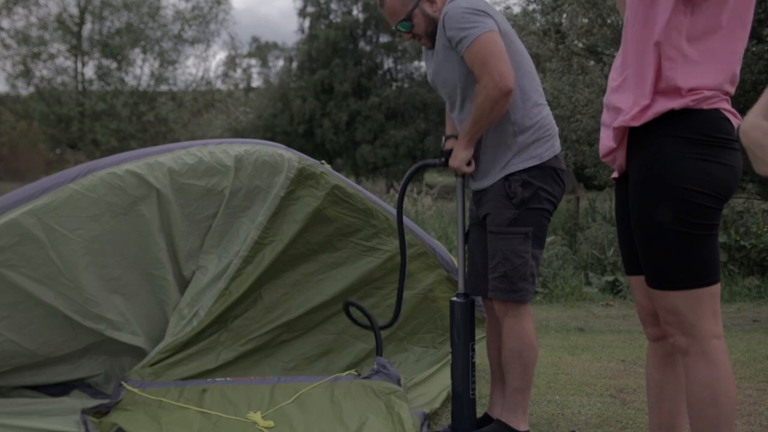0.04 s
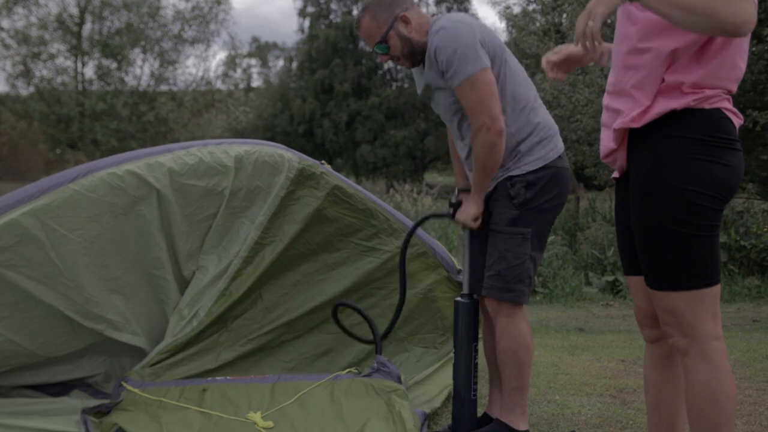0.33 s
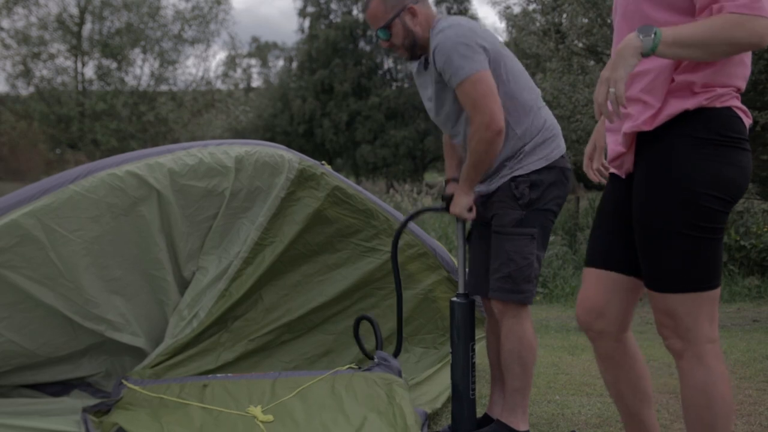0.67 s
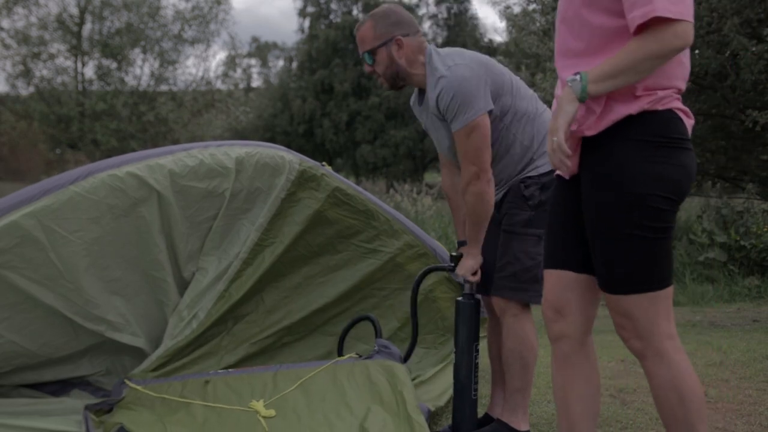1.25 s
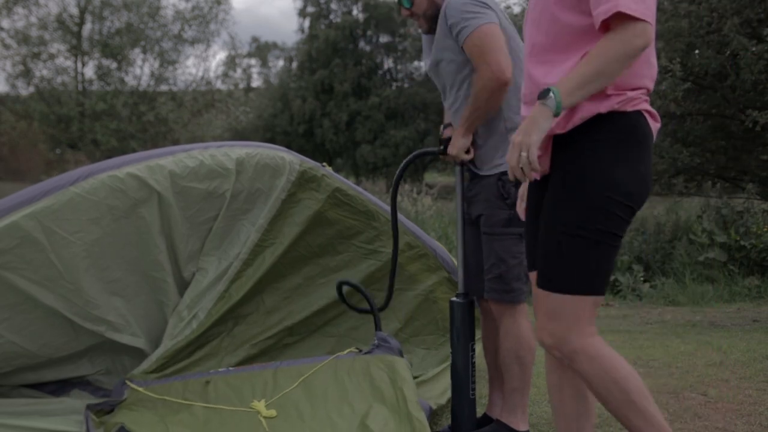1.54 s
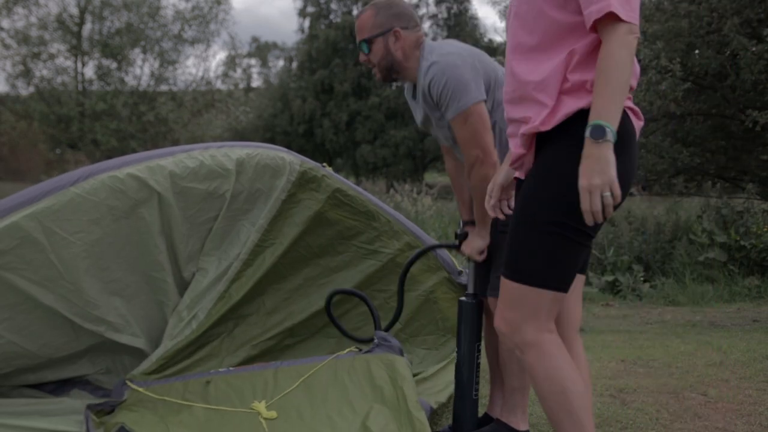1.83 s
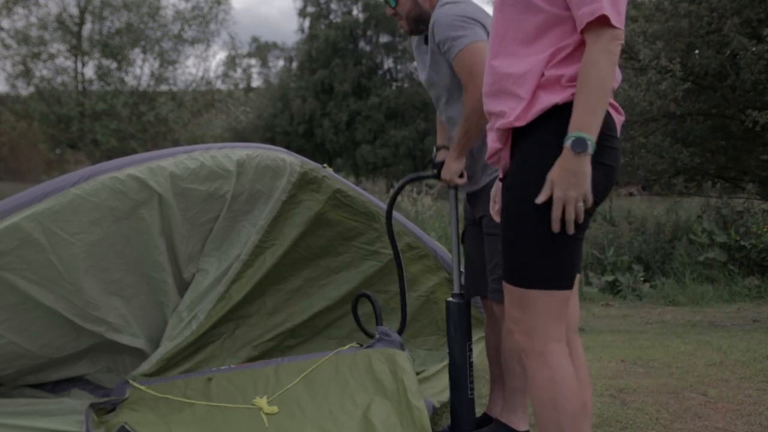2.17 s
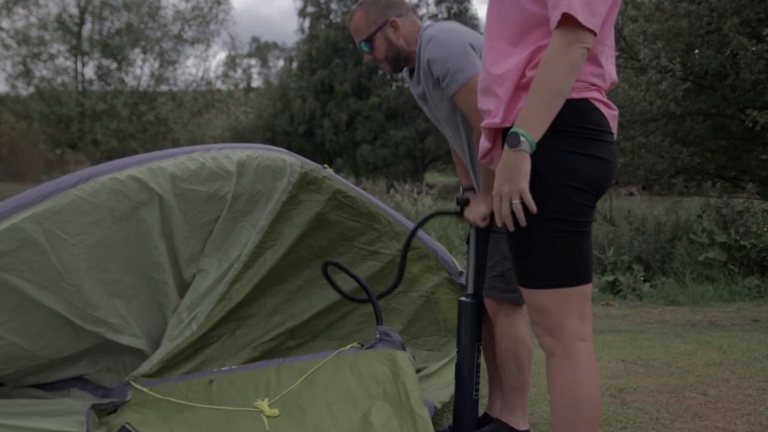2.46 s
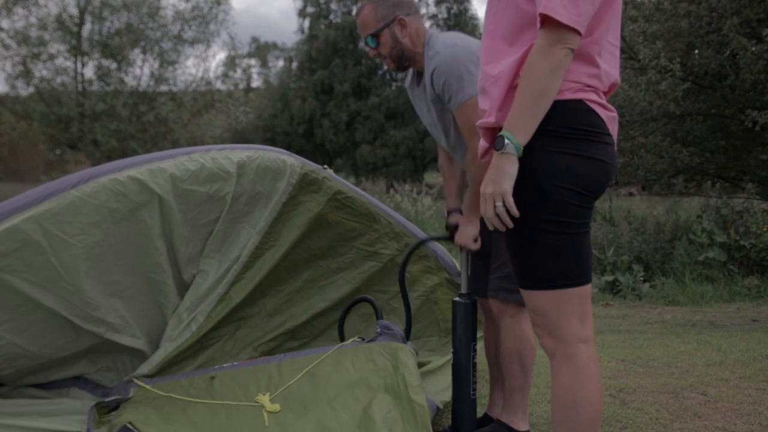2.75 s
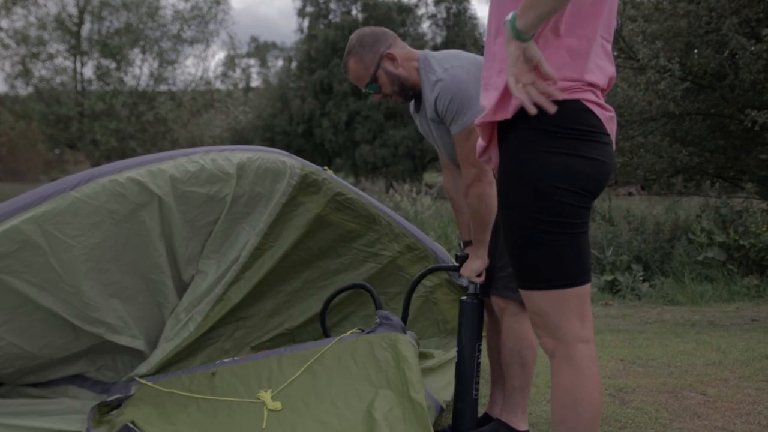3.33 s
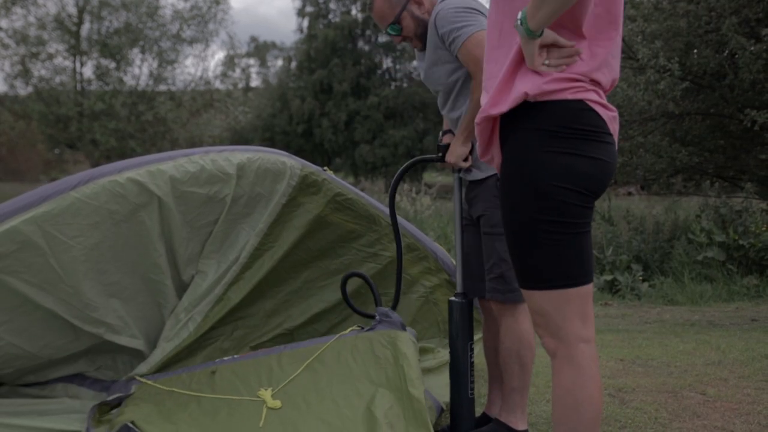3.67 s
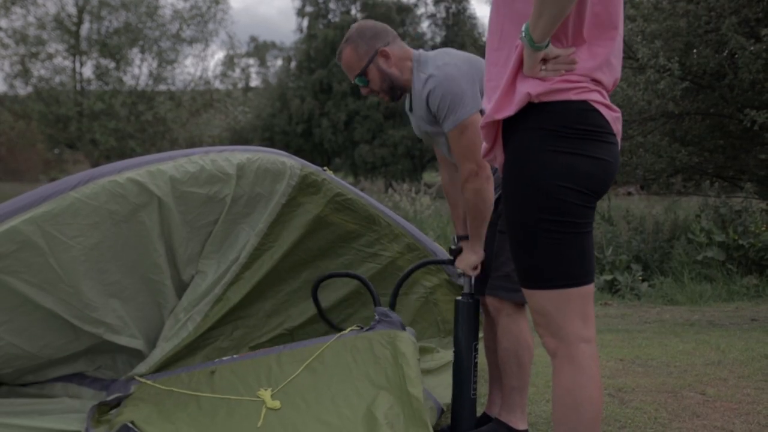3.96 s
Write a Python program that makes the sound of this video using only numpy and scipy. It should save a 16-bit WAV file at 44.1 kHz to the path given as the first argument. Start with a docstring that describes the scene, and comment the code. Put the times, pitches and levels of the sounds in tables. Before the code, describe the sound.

A hand pump fills a tent outdoors, with hissing rushes of air alternating between pull and push about every 0.35 seconds throughout. Thin, slightly falling whistles come from the hose, and each pull ends in a faint rasp. A valve claps at every turn, loudest near 3.8 seconds. Behind lie faint open air, a slight wind puff at 2.3 seconds and a soft step on grass at 2.7.

```python
"""A double-action hand pump fills an air tent on a lawn, breathing hard on every push and pull.
Each stroke is a rush of air through barrel and ribbed hose that swells, holds and dies as the piston
slows; the ribs whistle in sagging tones, and each pull tails off in a rasp. At the turns of the piston
a valve flap flutters and claps over. Behind lie faint open air, one puff of wind and one soft step."""
import sys
import numpy as np
from scipy import signal
from scipy.fft import rfft, irfft
from scipy.io import wavfile

SR = 44100
rng = np.random.default_rng(int(sys.argv[2]) if len(sys.argv) > 2 else 0)


def output_pcm(signal):
    """Save a mono or channel-first signal as 16-bit PCM at the path in sys.argv[1].

    Samples are clipped to [-1, 1] before scaling.
    """
    pcm = np.clip(np.atleast_2d(signal).T, -1, 1) * 32767
    wavfile.write(sys.argv[1], SR, np.round(pcm).astype(np.int16))


N = 176400
T = np.arange(N) / SR

# piston strokes (start [s], length [s], level [dB], swell depth [dB], slows after [s], slowing dip [dB])
PUSH_STROKES = [(.289, 0.37, -25.5, 13.5, 0.26, 14.5), (1.02, 0.36, -25, 16, 0.26, 13.5),
                (1.735, 0.34, -25.5, 14.5, 0.24, 15), (2.44, 0.38, -25.5, 25, 0.26, 17.5),
                (3.139, .349, -26, 14.5, 0.25, 16.5), (3.834, 0.32, -26, 10, .25, 16)]
PULL_STROKES = [(-.06, .349, -27.5, 9.7, 0.23, 14), (.653, .36, -27.5, 5.9, 0.23, 18.6),
                (1.377, .358, -26.5, 5.3, .24, 20), (2.083, 0.36, -27.5, 6.4, 0.23, 10.4),
                (2.793, 0.33, -28, 5.5, .23, 12.4), (3.488, 0.33, -28, 8.9, 0.24, 12)]
# tone colour of the two hisses and of the barrel's body (frequency [Hz], level [dB])
PUSH_HISS_COLOUR = [(880, -73), (1500, -48), (1670, -13), (2330, -9.5), (2700, -4), (3090, 0), (4140, -6.5),
                    (5450, -2), (6620, -7.5), (8450, -8), (9690, -21), (13800, -30), (15500, -38)]
PULL_HISS_COLOUR = [(1200, -29), (1800, -17), (2300, -4), (2800, -0.5), (3400, 3), (4200, -2.5),
                    (5300, 1.5), (6100, -0.5), (6800, -4), (8600, -5.5), (9800, -16.5), (11000, -21.5),
                    (14000, -24), (15500, -37)]
BARREL_COLOUR = [(40, -26), (90, -14.5), (140, -4), (300, -7), (500, 0.5), (780, 0.5), (1100, 1.5),
                 (1350, 0.5), (1750, 5.5), (2300, 4), (4000, -21), (9000, -37), (15000, -53)]
# hose resonances that sing
LOW_HZ, SECOND_HZ, MIDDLE_HZ, HIGH_HZ, HIGHEST_HZ = 3012, 3150, 3260, 3410, 3460
# hose whistles (middle [s], length [s], resonance [Hz], level [dB])
HOSE_WHISTLES = [(0.128, .17, LOW_HZ, -28), (.505, 0.2, LOW_HZ, -33), (.535, .11, MIDDLE_HZ, -30),
                 (0.48, .09, HIGH_HZ, -34), (0.531, .09, HIGHEST_HZ, -30), (0.857, .17, LOW_HZ, -27.5),
                 (1.223, .09, LOW_HZ, -26), (1.1, .11, MIDDLE_HZ, -43), (1.574, 0.11, MIDDLE_HZ, -30),
                 (1.604, 0.11, SECOND_HZ, -37), (1.949, .12, SECOND_HZ, -37), (1.964, .13, LOW_HZ, -44),
                 (1.96, 0.092, MIDDLE_HZ, -30.5), (2.276, .14, MIDDLE_HZ, -27), (2, 0.089, LOW_HZ, -35),
                 (2.695, .13, LOW_HZ, -31), (2.632, .14, MIDDLE_HZ, -32), (2.965, .09, HIGH_HZ, -29.5),
                 (3.01, .1, LOW_HZ, -27.5), (3.394, .1, LOW_HZ, -28.5), (3.347, 0.11, MIDDLE_HZ, -33.5),
                 (3.71, .12, LOW_HZ, -33.5), (3.68, 0.068, MIDDLE_HZ, -35)]
# valve claps (time [s], level [dB], ring [Hz], thud against ring [dB], clack against ring [dB])
VALVE_CLAPS = [(.2895, -27.5, 696, -4, -13), (.6535, -22, 515, -1.5, -11), (1.0198, -25.5, 470, -21, -12),
               (1.3772, -26, 479, 1.5, -7), (1.7375, -27, 525, -7, -3), (2.0825, -25, 617, 0.5, -4),
               (2.4398, -23.5, 490, -19, -11), (2.7925, -24.5, 594, 2, -6), (3.1385, -26, 525, -8, -9),
               (3.488, -23, 520, 0.5, -8), (3.8335, -16, 500, -16, -16)]
# flap flutters around the turns (time [s], level [dB])
VALVE_FLUTTERS = [(0.303, -35), (1.011, -34), (1.029, -45), (2.072, -39.5), (2.786, -40), (3.116, -40.5),
                  (3.153, -45), (3.479, -48), (3.811, -39.5)]
# tone colour of the open air and of the wind puff (frequency [Hz], level [dB])
OPEN_AIR_COLOUR = [(22, -37), (40, -12.5), (80, -7), (130, 1.5), (300, -2), (700, -3), (1500, -6),
                   (5000, -8.5), (15000, -29)]
WIND_COLOUR = [(22, -28), (40, -6), (80, -11), (120, 5), (220, -12), (500, -37), (2000, -70)]

# a push swells slowly; a pull bites sooner, with more barrel and jet
PUSH_FLOW = dict(peak_s=0.17, rise_curve=1.21, slowing_s=0.12, barrel_share=0.31)
PULL_FLOW = dict(peak_s=0.075, rise_curve=1.2, slowing_s=0.078, barrel_share=0.62)
PUSH_VOICE = dict(barrel_db=-14.5, hollow_db=-17.5, jet_db=-12, octave_db=-27)
PULL_VOICE = dict(barrel_db=-10.5, hollow_db=-21.5, jet_db=-2, octave_db=-4)


def air_rush(strokes, flow, colour, barrel_db, hollow_db, jet_db, octave_db):
    """Air driven by the piston: hiss and valve jet over a hollow ring and the body of the barrel."""
    hiss_gain, top_gain, barrel_gain, age = piston_flow(strokes, **flow)
    jet = valve_jet(age, jet_db, octave_db)
    hollow = undb(hollow_db) * ring(771.5, width_hz=61)
    hiss = hose(eddies(noise(colour)) + jet, age)
    top = signal.sosfiltfilt(signal.butter(4, 6400, "high", fs=SR, output="sos"), hiss)
    barrel = undb(barrel_db) * hose(eddies(noise(BARREL_COLOUR)), age)
    return hiss_gain * (hiss - top + hollow) + top_gain * top + barrel_gain * barrel


def piston_flow(strokes, peak_s, rise_curve, slowing_s, barrel_share):
    """The flow swells, droops and dies as the piston slows: three envelopes and the stroke's age [s]."""
    open_s, close_s, droop_db_per_s = 0.004, 0.005, 17
    hiss_gain, top_gain, barrel_gain, age = np.zeros((4, N))
    for start, length, db, swell_db, slows_after, dip_db in strokes:
        elapsed = np.maximum(T - start, 0)
        rise_db = -swell_db * np.clip(1 - elapsed / peak_s, 0, 1) ** rise_curve
        droop_db = droop_db_per_s * np.maximum(elapsed - peak_s, 0)
        slowing = np.sin(np.pi / 2 * np.clip((elapsed - slows_after) / slowing_s, 0, 1)) ** 2
        swing_db = rise_db - droop_db - dip_db * slowing
        gate = np.clip(elapsed / open_s, 0, 1) * np.clip(1 - (elapsed - length) / close_s, 0, 1)
        hiss_gain += gate * undb(db + swing_db)
        top_gain += gate * undb(db + 1.16 * swing_db)  # the top of the hiss needs fast flow
        barrel_gain += gate * undb(db + barrel_share * swing_db)  # the barrel follows more gently
        age = np.where(elapsed > 0, elapsed, age)
    return hiss_gain, top_gain, barrel_gain, age


def valve_jet(age, jet_db, octave_db):
    """The jet through the valve: a bright band and its lower octave, wandering, sinking and fading."""
    sag_hz_per_s, wander_hz, fade_db_per_s = 2400, 170, 36
    hz = 5738 - sag_hz_per_s * age + wander_hz * ring(0, width_hz=18)
    upper = undb(jet_db) * ring(hz, width_hz=360)
    lower = undb(octave_db) * ring(hz / 2, width_hz=360)
    return undb(-fade_db_per_s * age) * (upper + lower)


def eddies(rush):
    """Turbulence makes narrow bands of the rush flicker on their own."""
    band_hz, depth_db, bands = 260, 1.9, 36
    position = np.minimum(np.arange(N // 2 + 1) * SR / N / band_hz, bands - 1)
    spectrum, out = rfft(rush), np.zeros(N)
    flicker = undb(depth_db * ring(0, width_hz=15))
    for k in range(bands):
        band = irfft(spectrum * np.maximum(1 - abs(position - k), 0), N)
        out += band * np.roll(flicker, rng.integers(N))
    return unit(out)


def hose(rush, age):
    """Sound runs up and down the hose; its resonances sag through the stroke."""
    echo_s, stretch_per_s, reflection = 0.0081, 0.154, 0.25
    lag = echo_s * (1 + stretch_per_s * age) * SR
    n = np.arange(N)
    echoes = sum(reflection ** k * np.interp(n - k * lag, n, rush, left=0) for k in (1, 2, 3))
    return unit(rush + echoes)


def hose_whistles():
    """The ribs of the hose sing on one resonance and stir its neighbours, rough and sinking in pitch."""
    sag_hz_per_s, neighbour_step_hz = 680, 122
    roughness = ring(0, width_hz=24) + 1j * ring(0, width_hz=24)
    neighbours = ring(neighbour_step_hz, width_hz=12) + 1j * ring(neighbour_step_hz, width_hz=12)
    waver = 1 + 0.45 * roughness / np.sqrt(2) + undb(-12.5) * neighbours
    out = np.zeros(N)
    for middle, length, hz, db in HOSE_WHISTLES:
        pitch = hz - sag_hz_per_s * np.clip(T - middle, -length, length)
        tone = np.roll(waver, rng.integers(N)) * np.exp(2j * np.pi * np.cumsum(pitch) / SR)
        out += undb(db) * swell(middle, length) * unit(tone.real)
    return out


def valve_flap():
    """The flap flutters and claps over: a short hollow knock, a clack, a low thud and a noisy slap."""
    claps, slap_noise = np.zeros(N), ring(800, width_hz=650)
    for start, db, hz, thud_db, clack_db in VALVE_CLAPS:
        elapsed = np.maximum(T - start, 0)
        knock = burst(start, peak_s=0.0018) * np.sin(2 * np.pi * hz * elapsed)
        clack = undb(clack_db) * np.exp(-elapsed / 0.0086) * np.sin(2 * np.pi * 729 * elapsed)
        thud = undb(thud_db) * burst(start, peak_s=0.0009) * np.sin(2 * np.pi * 185 * elapsed)
        slap = undb(-7.5) * burst(start, peak_s=0.0014) * slap_noise
        claps += undb(db) * (knock + clack - thud + slap)
    flutter_gain = sum(undb(db) * burst(start, peak_s=0.0052) for start, db in VALVE_FLUTTERS)
    flutter = flutter_gain * ring(1214, width_hz=370)
    return signal.sosfilt(signal.butter(2, 100, "high", fs=SR, output="sos"), claps + flutter)


def intake_rasp():
    """The intake drops to a lower, falling rasp near the top of each pull."""
    centre_hz, fall_hz_per_s, delay_s = 1706, 3000, 0.22
    gain, hz = 0, centre_hz
    for start, *_ in PULL_STROKES:
        gain = gain + swell(start + delay_s, length_s=0.15)
        hz = np.where(T > start, centre_hz - fall_hz_per_s * (T - start - delay_s), hz)
    return undb(-43) * gain * ring(hz, width_hz=360)


def outdoors():
    """A faint bed of open air, with one low puff of wind and the soft shuffle of a step on grass."""
    step = undb(-45.5) * swell(2.7, length_s=0.23) * ring(175, width_hz=40)
    bed = undb(-48.5) * noise(OPEN_AIR_COLOUR)
    puff = undb(-43) * swell(2.315, length_s=0.15) * noise(WIND_COLOUR)
    return bed + puff + step


def undb(db):
    """Decibels to gain."""
    return 10 ** (np.asarray(db) / 20)


def unit(x):
    """Scale to rms 1."""
    return x / np.sqrt(np.mean(x ** 2))


def noise(colour):
    """Noise at rms 1, shaped by (frequency [Hz], level [dB]) points."""
    hz, db = np.array(colour, float).T
    bin_hz = np.maximum(np.arange(N // 2 + 1) * SR / N, 1)
    gain = undb(np.interp(np.log(bin_hz), np.log(hz), db))
    return unit(irfft(rfft(rng.standard_normal(N)) * gain, N))


def ring(hz, width_hz):
    """Noise in one steep-sided resonance whose centre may glide; at 0 Hz, a slow random wobble."""
    wobble = rng.standard_normal(N) + 1j * rng.standard_normal(N)
    for width in (width_hz, 4 * width_hz):
        wobble = signal.lfilter([1], [1, -np.exp(-np.pi * width / SR)], wobble)
    phase = 2 * np.pi * np.cumsum(np.broadcast_to(hz, N)) / SR
    return unit((wobble * np.exp(1j * phase)).real)


def swell(middle_s, length_s):
    """A smooth rise and fall."""
    return np.cos(np.pi * np.clip((T - middle_s) / length_s, -0.5, 0.5))


def burst(start_s, peak_s):
    """A quick attack to 1 and a decay."""
    progress = np.maximum(T - start_s, 0) / peak_s
    return progress * np.exp(1 - progress)


def scene():
    """Pump and open air, the same in both ears."""
    pushes = air_rush(PUSH_STROKES, PUSH_FLOW, PUSH_HISS_COLOUR, **PUSH_VOICE)
    pulls = air_rush(PULL_STROKES, PULL_FLOW, PULL_HISS_COLOUR, **PULL_VOICE)
    pump = pushes + pulls + intake_rasp() + hose_whistles() + valve_flap()
    return np.tile(pump + outdoors(), (2, 1))


def record(dry):
    """A steep low-pass trims the very top."""
    return signal.sosfilt(signal.ellip(10, 0.2, 80, 15700, fs=SR, output="sos"), dry)


dry = scene()
out = record(dry)
output_pcm(out)
```